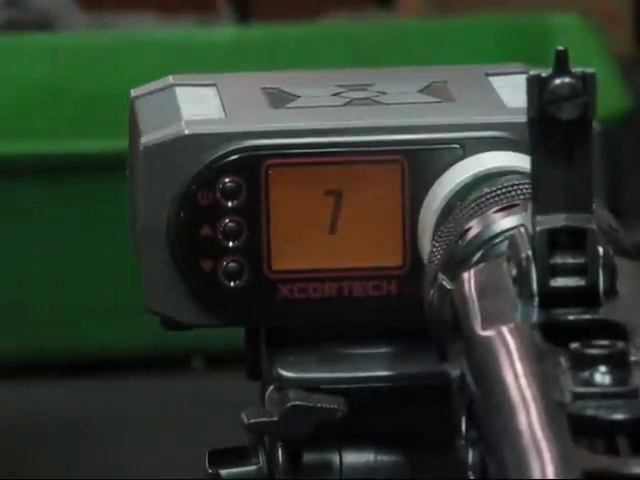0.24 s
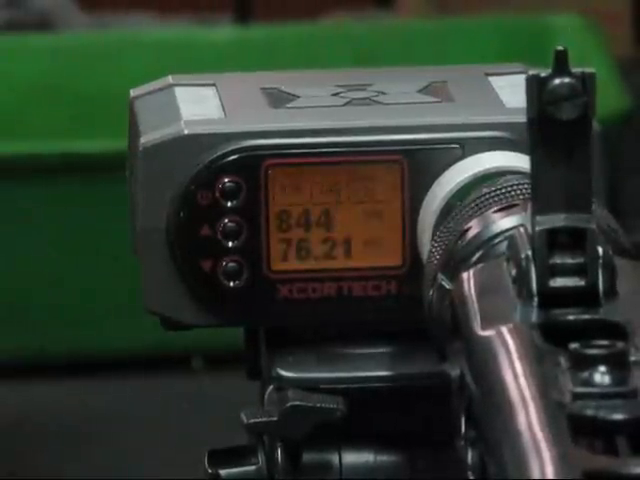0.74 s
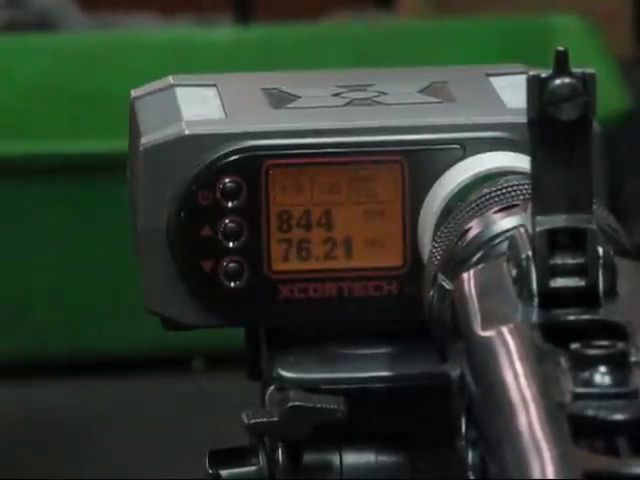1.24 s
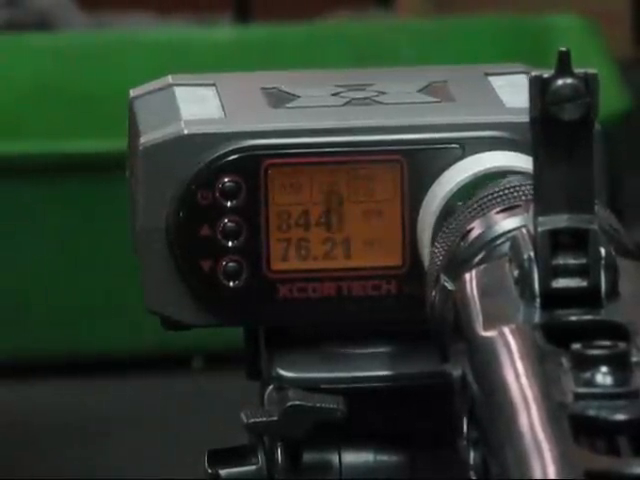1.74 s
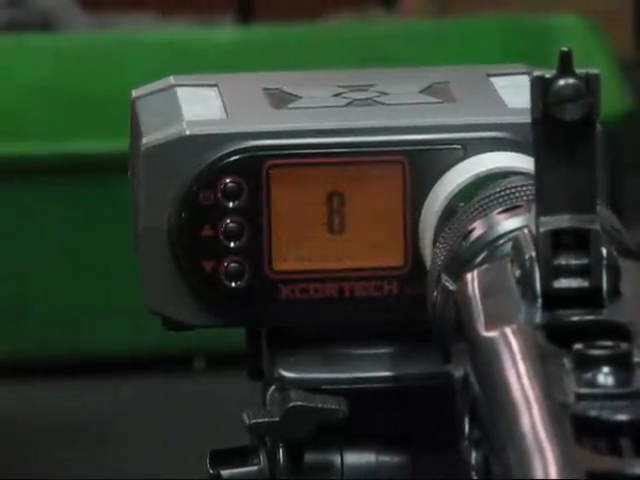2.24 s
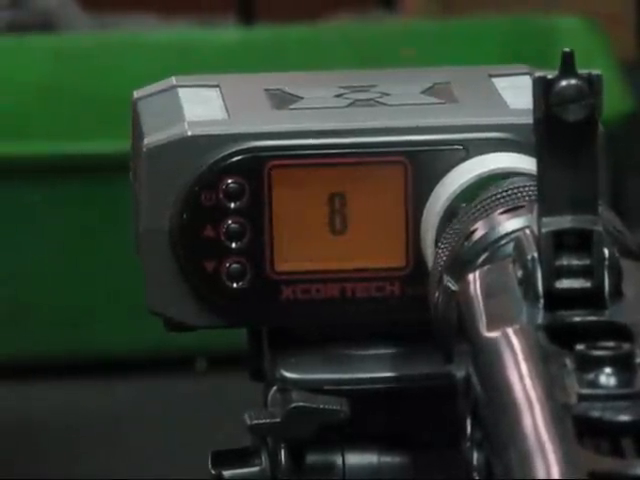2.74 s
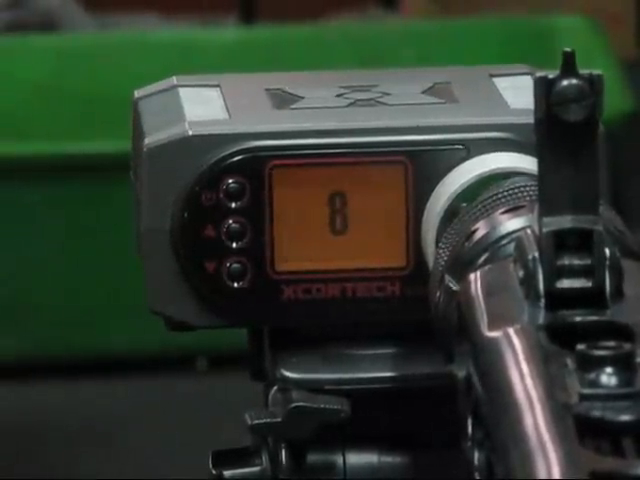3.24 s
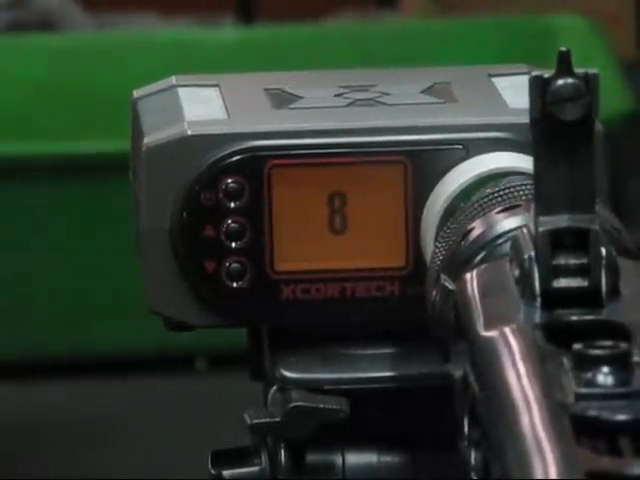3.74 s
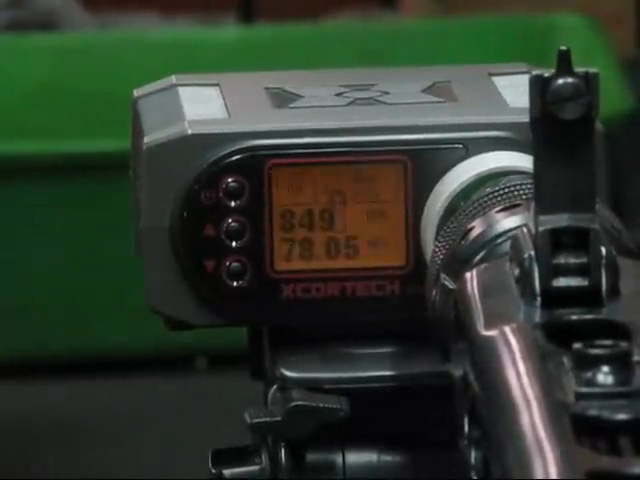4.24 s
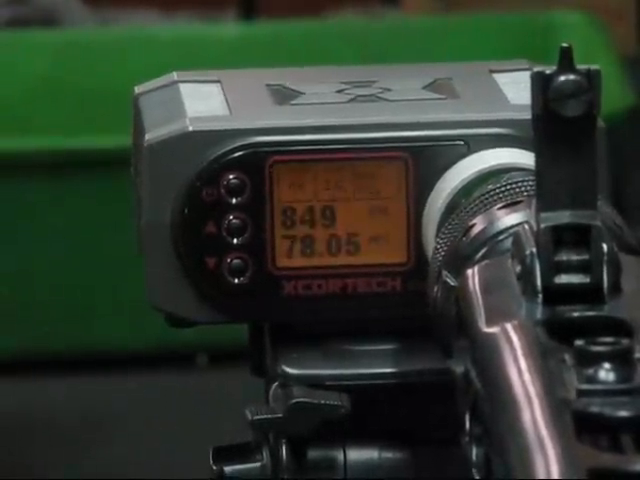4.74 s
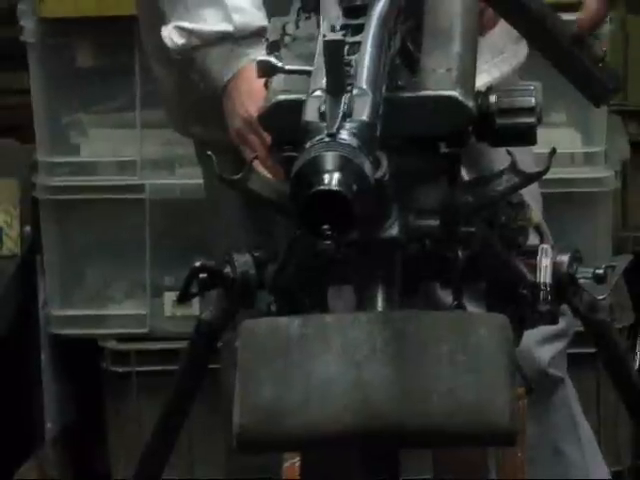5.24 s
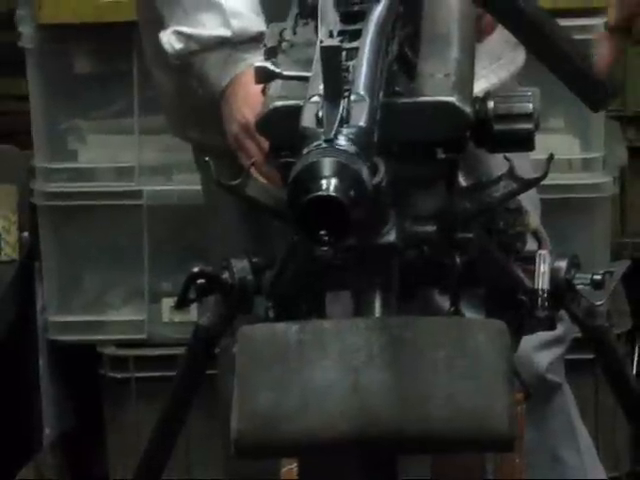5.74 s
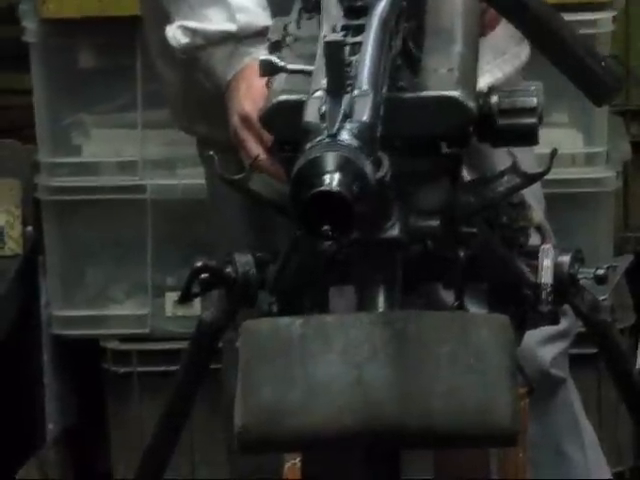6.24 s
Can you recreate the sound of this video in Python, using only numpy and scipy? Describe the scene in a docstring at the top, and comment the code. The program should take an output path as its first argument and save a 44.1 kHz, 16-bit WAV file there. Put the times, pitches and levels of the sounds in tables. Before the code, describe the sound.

Irregular sharp ratchet clicks and pellet rattle, a fast electric airsoft burst with whining gears, more clicking, brief silence, then louder hollow clicks and another burst.

```python
"""Airsoft gun: winding and bursts

An electric airsoft gun on a workshop bench, heard beside the barrel, then, after a short silence, from the front.
Magazine wheel clicks and pellet rattle are shaped noise; hollow knocks are struck modes of the box.
In two bursts gears draw the piston back and it slams about 14 times a second: noise plus shell and body modes.
Low-frequency noise and faint wandering sines fill the room."""
import sys
import numpy as np
from scipy import signal
from scipy.io import wavfile
from scipy.ndimage import uniform_filter1d

SR = 44100
rng = np.random.default_rng(int(sys.argv[2]) if len(sys.argv) > 2 else 0)


def dump(signal):
    """Clip the signal to [-1, 1] and save it as 16-bit WAV at the path in sys.argv[1]."""
    limited = np.clip(np.atleast_2d(signal).T, -1, 1)
    pcm = np.round(limited * 32767).astype(np.int16)
    wavfile.write(sys.argv[1], SR, pcm)


N = 286650
TIME = np.arange(N) / SR
FRONT_FROM_S = 4.9
FRONT = TIME > FRONT_FROM_S
EDGES_HZ = 25 * 2 ** np.arange(0, 9.4, 1 / 3)  # third octaves

# All levels are relative; "side" = beside the barrel, "front" = from the front.
# Pawl over a wheel tooth: t/s, click level/dB, hollow knock level/dB
PAWL_CLICKS = [(0.0004, -24.5, -52), (0.06, -28.5, -63), (0.1514, -27.5, -56), (0.21, -29, -48.5),
               (0.3049, -24, -52), (0.6025, -43, -64), (0.631, -43, -63), (0.6624, -26, -48.5),
               (0.7395, -22.5, -44.5), (0.797, -26, -54), (0.838, -23.5, -51), (0.9222, -26, -48),
               (0.973, -24, -46), (1.0545, -23.5, -47), (1.0957, -23, -47.5), (1.2164, -25, -45),
               (1.288, -22.5, -48.5), (1.3852, -37, -59), (1.4039, -22, -45), (1.498, -29.5, -51),
               (1.518, -22, -42.5), (1.57, -18, -37.5), (3.6894, -24.5, -51.5), (3.7681, -26, -49),
               (3.8514, -32, -60), (3.8621, -25, -52), (3.8921, -34, -55), (3.9165, -22, -46.5),
               (4.0056, -24.5, -51), (4.0748, -24, -50), (4.1395, -25.5, -55), (4.2105, -24.5, -48.5),
               (4.261, -22, -47), (4.3142, -25.5, -53), (4.3879, -23.5, -53.5), (4.4528, -20.5, -45.5),
               (4.558, -22, -46), (4.6204, -19.5, -48), (4.6934, -21.5, -48.5), (4.7507, -21, -52),
               (4.9776, -18, -41.5), (5.1236, -19, -41), (5.2096, -19.5, -37.5), (5.2988, -18, -40),
               (5.4074, -18.5, -41.5), (5.4715, -16.5, -43), (5.5717, -15.5, -41), (5.6624, -14, -35),
               (5.7563, -16, -42), (5.8162, -13.5, -42), (5.8917, -13.5, -42), (5.9736, -15, -40.5)]
# Short cracks around the bursts, the last being the sharp crack of the second burst's first slam:
# t/s, level/dB, hollow knock level/dB, brightness/(dB/octave)
BURST_CRACKS = [(1.5337, -26.5, -41, -5.5), (1.6746, -3.5, -45, -4), (3.5612, -18, -51, -5),
                (6.0477, -20, -56, -6), (6.099, -4.5, -48, -4.5), (6.1096, 5.5, -52, -1)]
# Click and crack spectrum: f/Hz, density/dB
CLICK_SPECTRUM = [(180, -39.5), (300, -22), (764, -11), (1110, -10.5), (1940, -6.5), (3390, -2),
                  (4640, -2.5), (5200, -35), (5740, -3), (12800, -2), (13900, -28), (15100, -33)]
# Click decay: f/Hz, crack t60/s (stretched for front pawl clicks), ringing t60/s
CLICK_DECAY = [(500, 0.012, 0.35), (2500, 0.077, 0.57), (6000, 0.052, 0.37), (11400, 0.011, 0.26)]
# Hollow magazine box modes: f/Hz, side level/dB, front level/dB, t60/s
BOX_MODES = [(616.5, -6.5, -6.5, 0.11), (668, -2.5, -19, 0.049), (721, -16, -1.5, 0.12),
             (970, -14, -8, 0.19), (1670, -3, -9, 0.053)]
# Pellet rattle spectrum: f/Hz, density/dB
RATTLE_SPECTRUM = [(470, -38.5), (800, -1), (1050, -7), (2420, -7), (2980, -3.5), (4530, -13),
                   (5370, -12.5), (12500, -17.5), (15100, -14.5)]
# Background sections: start t/s, room tone level/dB, drift/(dB/s)
BACKGROUND = [(0, -55, 2.5), (1.62, -50, 0), (3.56, -55.5, 4.5), (4.9, -44, 4.5), (6.09, -52, -30)]
# Room noise spectra: f/Hz, density/dB
ROOM_SIDE = [(15, -36), (25, -7.5), (54, -15), (82, -17.5), (394, -19), (730, -23), (867, -16.5),
             (981, -36), (1060, -20.5), (1320, -17), (1450, -17), (9000, -77), (11700, -85.5),
             (19800, -120)]
ROOM_FRONT = [(15, -30), (25, -6), (87, 3.5), (350, 3), (695, 4.5), (1010, -3), (1290, -16), (1690, -4),
              (1890, -29), (2750, -18), (5000, -23), (6500, -40), (11000, -120)]
# Steady room tones: mean f/Hz, side level/dB, front level/dB
ROOM_TONES = [(48.6, -4, -8), (324, -20.5, -42), (884, -17.5, -34), (1080, -15, -36.5), (1297, -13.5, -40),
              (459, -21, -15.5)]
# Bursts: first slam t/s, slow-start delay/s, share of delay left per shot, cycle/s, slam level/dB,
# first slam level relative to the others/dB, gears at speed t/s, trigger released t/s, gear level/dB,
# loud start, soon gone/dB
BURSTS = [(1.687, .0176, .21, .07054, -3.5, -1.5, 1.6343, 3.505, -16.5, 0),
          (6.1103, .0225, 0.118, .0716, -4, -8, 6.1, 6.6, -25.5, 14.5)]
# Gear load in one piston cycle, teeth let go just before the slam: t from slam/s, level/dB
STROKE = [(-.055, 0), (-.04, -1), (-.025, -0.5), (-.016, 0), (-.0135, -5), (0, -4.5)]
# Slam spectra: f/Hz, density/dB
SLAM_SIDE = [(24, -60.5), (40, -8.5), (434, -16), (1260, -4), (1580, -8), (2290, -8), (3160, -8), (4150, 0),
             (5590, -2), (6820, -4.5), (9180, -12.5), (12100, -9.5), (15100, -22)]
SLAM_FRONT = [(24, -58), (40, -56), (206, -18.5), (645, -16.5), (891, -9), (4250, 0), (4700, 7),
              (7170, -2.5), (9180, -5), (9890, -11), (12700, -8), (15100, -33)]
# Slam decay: f/Hz, crack t60/s, ringing t60/s
SLAM_DECAY = [(100, 0.077, 0.085), (700, 0.2, 0.24), (2480, 0.22, .35), (5530, 0.017, 0.19),
              (12000, 0.14, 0.31)]
# Gear grind spectra: f/Hz, density/dB
GRIND_SIDE = [(24, -71), (40, -41.5), (529, -26.5), (806, -13), (2020, -9.5), (2400, -5), (3850, -9),
              (5590, -7.5), (6490, -9), (9420, -9.5), (10400, -14.5), (13000, -12.5), (15100, -25)]
GRIND_FRONT = [(24, -42), (40, -26), (173, -17.5), (584, -11.5), (936, -1), (2020, 0), (2180, -0.5),
               (3010, -1.5), (4050, -3.5), (4940, -1.5), (12400, -11.5), (15100, -12)]
# Gearbox shell resonances: f/Hz, width/Hz, level/dB
SHELL = [(2420, 41, -15.5), (3104, 53, -10), (4570, 120, -7), (5120, 91, -5), (5550, 140, -1.5),
         (8980, 720, -7.5)]
# Receiver and bench modes: f/Hz, side level/dB, front level/dB, t60/s
BODY_MODES = [(69.6, -55.5, -60, .06), (216.6, -36.5, -48, 0.14), (263, -35, -33, 0.14),
              (900, -46, -22, 0.076), (1271, -24, -18.5, 0.094)]
# Left-right correlation of the noise layers: f/Hz, correlation
GUN_LIKENESS = [(60, 0.31), (110, 0.13), (200, 0.43), (370, 0.66), (690, 0.56), (1270, 0.9), (2340, 0.4),
                (4320, 0.93), (7950, 0.98), (14600, 0.96)]
QUIET_LIKENESS = [(60, 0.98), (180, 1.0), (540, 0.89), (1620, 0.82), (4880, 0.56), (14600, 0.56)]
FRONT_LIKENESS = [(60, 1), (180, 0.99), (540, 0.99), (1620, 0.68), (4880, 0.86), (14600, 0.89)]

LEAN_DB = -0.37  # noise layers, left minus right
TILT_SIDE_DB_PER_OCT, TILT_FRONT_DB_PER_OCT, TILT_SPREAD_DB_PER_OCT = 0.3, 1, 1.0  # pawl clicks
RATTLE_SIDE_DB, RATTLE_FRONT_DB = -2.5, -2.5  # re room tone
SETTLE_DB, SETTLE_DB_PER_S, SHAKEN_FROM_S = 11.5, 105, .605  # pellets settle, then are shaken again
SLAMS_PER_BURST = 26, 6
TIRING_S_PER_SHOT2 = .0000145  # cycle lengthens shot by shot
SWELL_DB_PER_S, SLAM_SCATTER_DB = 0.46, 0.84
SPIN_UP_DB_PER_S, LOUD_START_FALL_DB_PER_S = 549, 450
RUN_DOWN_DB_PER_S, ECHO_DB, ECHO_FALL_DB_PER_S = 381, -18.5, 139.5  # after trigger release
FADE_FROM_S, FADE_DB_PER_S, SILENT_FROM_S, BACK_S = 4.8, 895, 4.845, 4.934
CUTOFF_HZ = 14850


def amp(db):
    """Decibels to gain."""
    return 10 ** (np.asarray(db) / 20)


def rms_one(x):
    """Scale to unit power."""
    return x / np.sqrt(np.mean(x ** 2) + 1e-20)


def at_hz(rows, hz, column=1):
    """Read one table column on a log-frequency axis."""
    rows = np.array(rows)
    return np.interp(np.log(hz), np.log(rows[:, 0]), rows[:, column])


def band_gains(spectrum):
    """Band gains from a density spectrum, normalised to unit total power."""
    centre_hz = np.sqrt(EDGES_HZ[1:] * EDGES_HZ[:-1])
    gains = amp(at_hz(spectrum, centre_hz)) * np.sqrt(np.diff(EDGES_HZ))
    return gains / np.sqrt(np.sum(gains ** 2))


def grains(per_s, spread_db):
    """Two stereo pairs of uneven random clicks on a little noise."""
    shape = (2, 2, N)
    present = rng.random(shape) < per_s / SR
    sizes = amp(spread_db * np.minimum(rng.exponential(1, shape), 4)) * present
    return rms_one(sizes * rng.standard_normal(shape) + 0.054 * rng.standard_normal(shape))


def coloured(white, envelope, likeness, likeness_front):
    """Third-octave stereo noise; mid/side mix sets correlation, envelope(k, hz) the gain in time."""
    out = np.zeros((2, N))
    lean = amp(LEAN_DB / 2)
    for k, (low, high) in enumerate(zip(EDGES_HZ, EDGES_HZ[1:])):
        hz = np.sqrt(low * high)
        band = signal.butter(2, [low, high], "band", fs=SR, output="sos")
        mid, side = signal.sosfilt(band, white[k % 2])  # neighbouring bands use different pairs
        alike = np.where(FRONT, at_hz(likeness_front, hz), at_hz(likeness, hz))
        alike = np.clip(alike, 0, 1)
        pair = np.sqrt(1 + alike) * mid + np.sqrt(1 - alike) * side * [[1], [-1]]
        unit_power = np.sqrt(SR / 4 / (high - low))
        out += pair * [[lean], [1 / lean]] * envelope(k, hz) * unit_power
    return out


def dying(events, gains, t60, rise_s=0.00052):
    """Power envelope: fast rise at each event, exponential decay."""
    train = np.full(N, 1e-12)
    np.add.at(train, np.round(np.array(events)[:, 0] * SR).astype(int), gains ** 2)
    soft = np.exp(-1 / (rise_s * SR))
    poles = np.convolve([1, -soft], [1, -amp(-120 / (t60 * SR))])
    return signal.lfilter([1 - soft], poles, train)


def blow_power(events, gains, decay, hz, ring_db, rise_s):
    """Power of a blow: crack decay plus a scaled ringing decay."""
    crack_s, ring_s = at_hz(decay, hz, column=1), at_hz(decay, hz, column=2)
    crack = dying(events, gains, crack_s, rise_s)
    return crack + dying(events, gains * amp(ring_db), ring_s, rise_s)


def struck(times, level_db, modes, scatter_db):
    """Damped sine modes, each blow exciting each with a random strength and sign."""
    out = np.zeros(N)
    for hz, side_db, front_db, t60 in modes:
        strikes = np.full(N, 1e-18)
        own = amp(scatter_db * rng.standard_normal(len(times))) * rng.choice([-1, 1], len(times))
        view_db = np.where(times > FRONT_FROM_S, front_db, side_db)
        np.add.at(strikes, np.round(times * SR).astype(int), own * amp(level_db + view_db))
        r, w = amp(-60 / (t60 * SR)), 2 * np.pi * hz / SR
        out += signal.lfilter([0, np.sin(w)], [1, -2 * r * np.cos(w), r * r], strikes)
    return out


def background():
    """Room tone and pellet rattle levels in dB: drifting sections, joins smoothed."""
    start, db, drift_db = np.transpose(BACKGROUND)
    part = np.searchsorted(start[1:], TIME)
    tone_db = uniform_filter1d(db[part] + drift_db[part] * (TIME - start[part]), size=3000)
    shaken_db = np.where(FRONT, RATTLE_FRONT_DB, RATTLE_SIDE_DB)
    settling_db = SETTLE_DB - SETTLE_DB_PER_S * TIME
    return tone_db, tone_db + np.where(TIME < SHAKEN_FROM_S, settling_db, shaken_db)


def pellet_rattle(rattle_db):
    """Rattle gain in time: random bumps of loose pellets raise a steady level."""
    bump_s, bump_db = rng.uniform(0, N / SR - .01, 300), np.minimum(rng.exponential(4.0, 300), 8)
    bumps = dying(np.column_stack([bump_s, bump_db]), amp(bump_db), .02)
    return amp(rattle_db) * rms_one(np.sqrt(1 + 3 * bumps))


def box_knocks(clicks, front_pawl):
    """Pellets tumble against the hollow box after each click; later hits are weaker."""
    mean_s = np.where(front_pawl, .014, .003)[:, None]
    tumble_s = rng.exponential(1, (len(clicks), 4)) * mean_s + 0.00294
    knock_db = clicks[:, 2:] - 250 * tumble_s
    return struck((clicks[:, :1] + tumble_s).ravel(), knock_db.ravel(), BOX_MODES, scatter_db=2.5)


def room_tones(tone):
    """Sines with 0.1 % rms pitch wander, following the room level."""
    out = np.zeros(N)
    for hz, side_db, front_db in ROOM_TONES:
        wander = rms_one(uniform_filter1d(rng.standard_normal(N), size=4000))
        line = np.sin(2 * np.pi * np.cumsum(hz * (1 + 0.001 * wander)) / SR)
        out += tone * amp(np.where(FRONT, front_db, side_db)) * rms_one(line)
    return out


def magazine_and_room():
    """Clicks, cracks, rattle and room noise add in power per band; knocks and tones add on top."""
    clicks = np.array(PAWL_CLICKS + [row[:3] for row in BURST_CRACKS])
    pawl = np.arange(len(clicks)) < len(PAWL_CLICKS)
    in_front = clicks[:, 0] > FRONT_FROM_S
    front_pawl = in_front & pawl
    tilt_db = np.where(in_front[pawl], TILT_FRONT_DB_PER_OCT, TILT_SIDE_DB_PER_OCT)
    tilt_db = tilt_db + TILT_SPREAD_DB_PER_OCT * rng.standard_normal(len(PAWL_CLICKS))
    tilt_db = np.append(tilt_db, np.array(BURST_CRACKS)[:, 3])
    scatter = amp(2.2 * rng.standard_normal((len(clicks), len(EDGES_HZ))))
    tone_db, rattle_db = background()
    tone, rattle = amp(tone_db), pellet_rattle(rattle_db)
    click, hiss = band_gains(CLICK_SPECTRUM), band_gains(RATTLE_SPECTRUM)
    room_side, room_front = band_gains(ROOM_SIDE), band_gains(ROOM_FRONT)
    # from the front the wheel is hidden: reflections draw its crack out
    smeared = np.array(CLICK_DECAY) * [1, 2.2, 1.0]

    def envelope(k, hz):
        gains = amp(clicks[:, 1] - 8 + tilt_db * np.log2(hz / 5000)) * click[k] * scatter[:, k]
        direct = blow_power(clicks, gains * ~front_pawl, CLICK_DECAY, hz, ring_db=-13.5, rise_s=.0006)
        hidden = blow_power(clicks, gains * front_pawl, smeared, hz, ring_db=-11, rise_s=0.00057)
        room = tone * amp(-6.0) * np.where(FRONT, room_front[k], room_side[k])
        return np.sqrt(direct + hidden + (rattle * hiss[k]) ** 2 + room ** 2)

    noise = coloured(grains(6000, spread_db=-0.5), envelope, QUIET_LIKENESS, FRONT_LIKENESS)
    return noise + box_knocks(clicks, front_pawl) + room_tones(tone)


def bursts():
    """Slam rows (t/s, level/dB) and gear gain: spin-up, loud start, swell, run-down with echo."""
    slams, gears = [], 0
    for shots, row in zip(SLAMS_PER_BURST, BURSTS):
        first, slow, left, cycle, db, first_db, on, off, gear_db, loud_start_db = row
        k = np.arange(shots)
        slam_s = first + slow * (1 - left ** k) + cycle * k + TIRING_S_PER_SHOT2 * k ** 2
        slam_db = db + first_db * (k == 0) + SWELL_DB_PER_S * (slam_s - first)
        slams += zip(slam_s, slam_db + SLAM_SCATTER_DB * rng.standard_normal(shots))
        early, since = np.maximum(on - TIME, 0), np.maximum(TIME - on, 0)
        after = np.maximum(TIME - off, 0)
        level_db = gear_db + SWELL_DB_PER_S * since - SPIN_UP_DB_PER_S * early
        level_db = level_db + np.maximum(loud_start_db - LOUD_START_FALL_DB_PER_S * since, 0)
        run_down, echo = amp(-RUN_DOWN_DB_PER_S * after), amp(ECHO_DB - ECHO_FALL_DB_PER_S * after)
        gears = gears + amp(level_db) * np.maximum(run_down, echo)
    return np.array(slams), gears + 1e-9


def gear_load(slam_s):
    """Piston stroke load leading up to each slam, as a gain."""
    coming = slam_s[np.minimum(np.searchsorted(slam_s, TIME), len(slam_s) - 1)]
    return amp(np.interp(TIME - coming, *np.transpose(STROKE)))


def resonate(x, hz, width_hz):
    """Two-pole resonance, unit peak gain."""
    r = np.exp(-np.pi * width_hz / SR)
    poles = [1, -2 * r * np.cos(2 * np.pi * hz / SR), r * r]
    return signal.lfilter(np.array([1, 0, -1]) * (1 - r * r) / 2, poles, x)


def shell_singing(teeth, slams, gears, stroke):
    """Tooth chatter excites the shell resonances, gated by meshing and slams."""
    meshing = gears * stroke ** 2.0  # stops more sharply than the grind
    shake = meshing + np.sqrt(dying(slams, amp(slams[:, 1] - 10), 0.19))
    chatter = teeth[1, 0] + 0.11 * teeth[0]
    singing = sum(amp(db) * rms_one(resonate(chatter, hz, width)) for hz, width, db in SHELL)
    return singing * shake * amp(np.where(FRONT, -18, -7))


def gun():
    """Slams and gear grind add in power per band; shell singing and body thuds add on top."""
    slams, gears = bursts()
    stroke = gear_load(slams[:, 0])
    load = gears * stroke
    scatter = amp(1.2 * rng.standard_normal((len(slams), len(EDGES_HZ))))
    slam = np.where(slams[:, :1] > FRONT_FROM_S, band_gains(SLAM_FRONT), band_gains(SLAM_SIDE))
    grind_side, grind_front = band_gains(GRIND_SIDE), band_gains(GRIND_FRONT)

    def envelope(k, hz):
        gains = amp(slams[:, 1] - 7.5) * slam[:, k] * scatter[:, k]
        hit = blow_power(slams, gains, SLAM_DECAY, hz, ring_db=-4.5, rise_s=0.00041)
        grind = load * np.where(FRONT, grind_front[k], grind_side[k])
        return np.sqrt(hit + grind ** 2)

    thud = struck(slams[:, 0] + 0.002164, slams[:, 1], BODY_MODES, scatter_db=4.0)
    teeth = grains(9000, spread_db=-0.5)
    noise = coloured(teeth, envelope, GUN_LIKENESS, FRONT_LIKENESS)
    return noise + shell_singing(teeth, slams, gears, stroke) + thud


def scene():
    """Magazine, room and gun, with a fade into a short silence between the two views."""
    fade = amp(-FADE_DB_PER_S * np.maximum(TIME - FADE_FROM_S, 0)) * (TIME < SILENT_FROM_S)
    return (magazine_and_room() + gun()) * np.where(TIME > BACK_S, 1, fade)


def record(dry):
    """Round off loud peaks (tanh), then a steep elliptic low-pass."""
    rounded = .9 * np.tanh(dry / .9)
    low_pass = signal.ellip(10, .5, 70, CUTOFF_HZ, fs=SR, output="sos")
    return np.clip(signal.sosfilt(low_pass, rounded), -1, 1)


dry = scene()
out = record(dry)
dump(out)
```